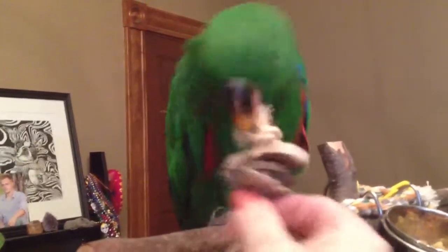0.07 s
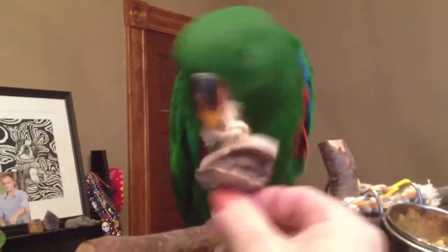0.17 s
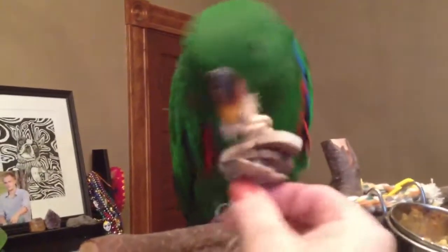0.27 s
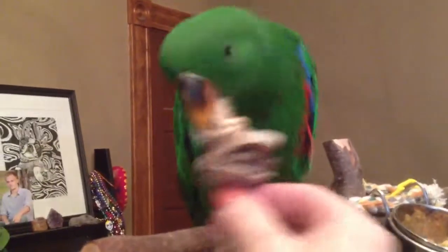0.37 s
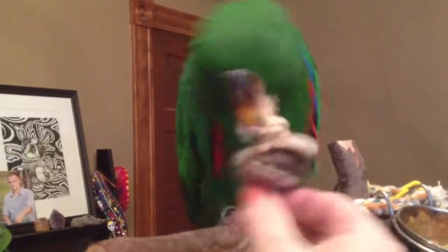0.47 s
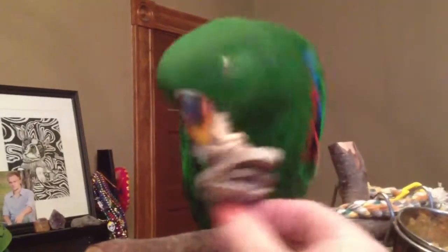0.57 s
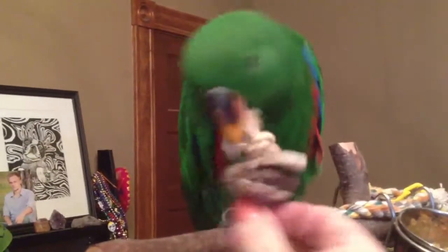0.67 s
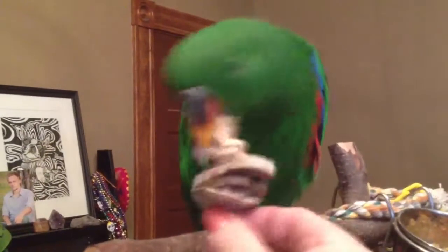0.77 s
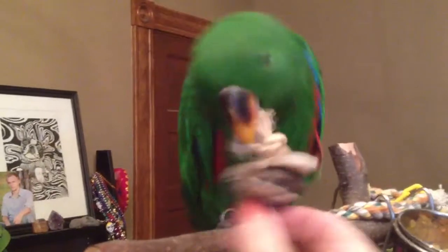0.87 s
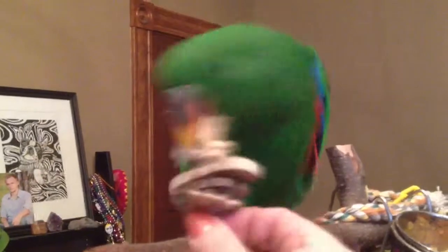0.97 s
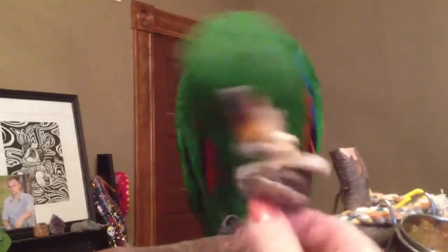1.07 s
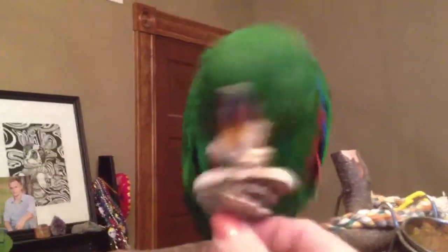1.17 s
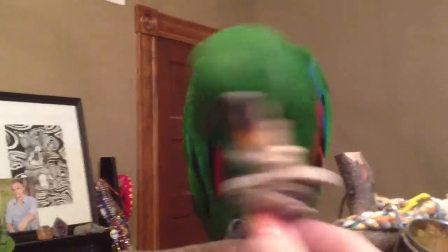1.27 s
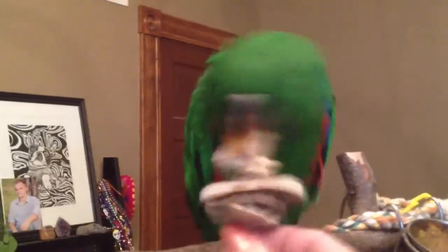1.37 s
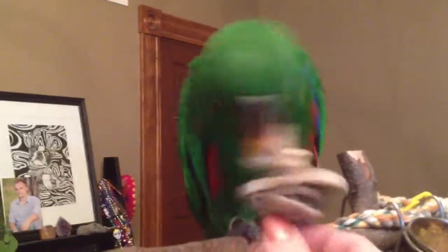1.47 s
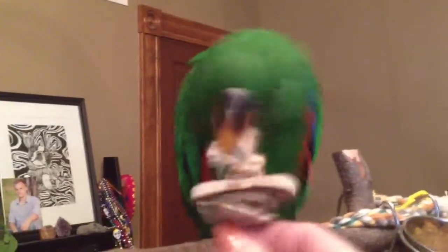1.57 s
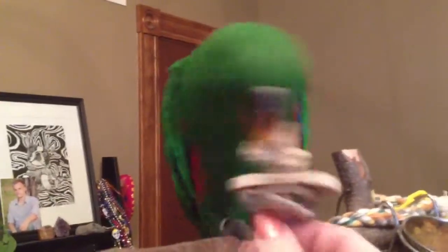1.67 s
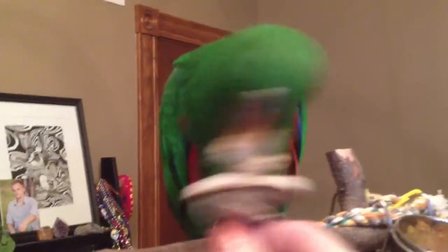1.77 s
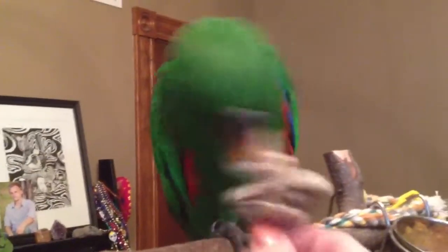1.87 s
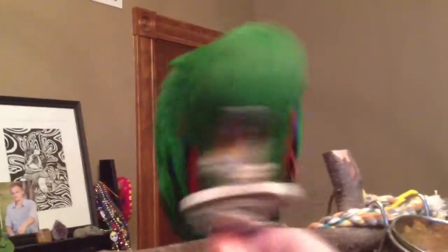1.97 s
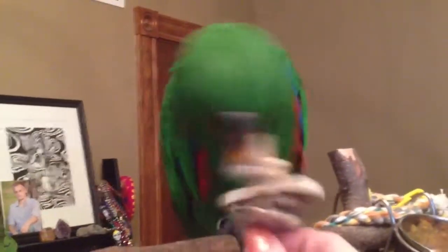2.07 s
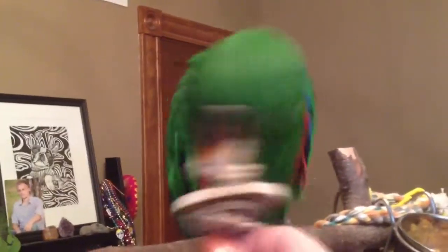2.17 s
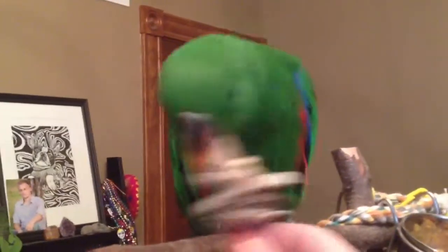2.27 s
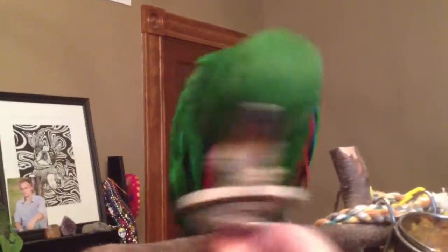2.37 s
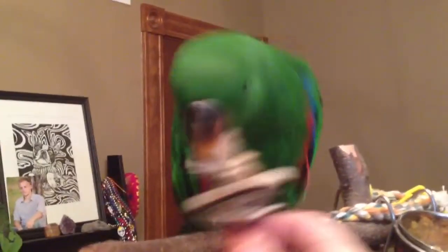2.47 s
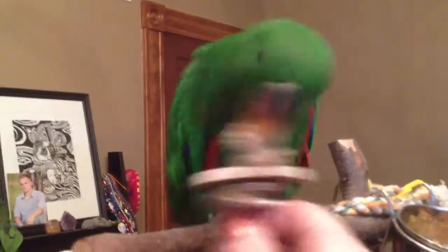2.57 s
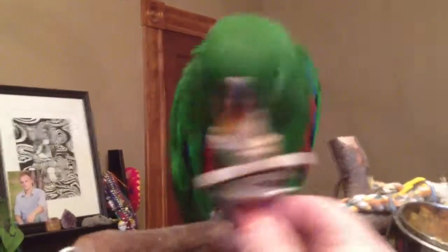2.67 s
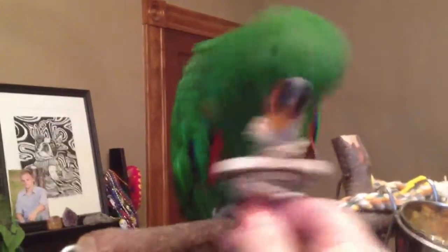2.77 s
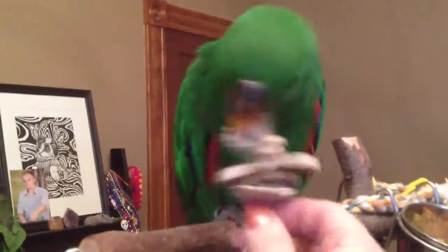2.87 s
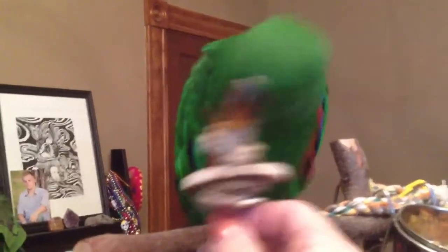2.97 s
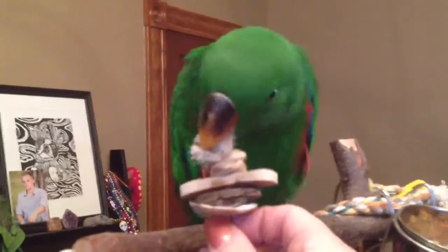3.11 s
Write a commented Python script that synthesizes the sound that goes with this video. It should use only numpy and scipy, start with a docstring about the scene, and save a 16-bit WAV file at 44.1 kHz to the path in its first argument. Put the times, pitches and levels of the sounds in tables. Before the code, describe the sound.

A wooden chew toy clatters in a parrot's beak, about five shakes a second: dry clacks, bead clicks and tiny ticks over soft rustling and low thuds, close microphone in a small quiet room.

```python
"""Parrot shaking a wooden chew toy

Close microphone in a small room: a parrot swings discs and beads on a rope, about five swings a second.
Pieces click and scrape and the stack knocks together, each made of short decaying modes and a buzz of
neighbours; most carry a room tail of sparse echoes. Rope and feathers rustle and a soft low thud follows
each swing, all shaped noise. Room noise and faint hum sines lie beneath."""
import sys
import numpy as np
from scipy import signal
from scipy.fft import rfft, irfft, next_fast_len
from scipy.io import wavfile
from scipy.ndimage import uniform_filter1d

SR = 44100
rng = np.random.default_rng(int(sys.argv[2]) if len(sys.argv) > 2 else 0)


def persist_wave(psi):
    """Save psi, clipped to +-1, as 16-bit WAV."""
    counts = np.round(np.clip(psi, -1, 1) * 32767).astype(np.int16)
    wavfile.write(sys.argv[1], SR, np.atleast_2d(counts).T)


N = 141120  # samples, 3.2 s

# Room noise spectrum. Each row: frequency in Hz, relative density in dB.
FLOOR_SPECTRUM = [(25, -49), (60, -32), (130, 2.5), (300, 4.5), (1000, -3), (15000, -6.5)]
# Steady hum. Each row: frequency in Hz, rms level in dB.
HUM_TONES = [(86, -87.5), (240, -81.5), (360, -83)]
# How strongly the rope is worked. Each row: time in seconds, rms level of the rubbing in dB.
ROPE_WORKING = [(0, -62.5), (.3, -66.5), (.39, -72.5), (.5, -62), (.95, -61.5), (1.4, -58.5), (2.03, -56),
                (2.21, -61.5), (2.35, -57), (3.0, -54.5), (3.2, -66)]
# Rope hiss spectrum. Each row: frequency in Hz, relative density in dB.
ROPE_SPECTRUM = [(200, -21), (800, -7), (4500, -3), (7600, -2.5), (9200, -11), (12000, -5.5), (15000, -10)]
# Swings of the head. Each row: rustle peak in seconds, rustle level in dB, thud level in dB.
HEAD_SWINGS = [(0.031, -52, -57.5), (0.124, -90, -62), (0.258, -52, -66), (0.451, -51, -61),
               (0.653, -56, -59.5), (0.856, -55.5, -61), (1.09, -49, -56), (1.288, -48.5, -62.5),
               (1.481, -47.5, -58.5), (1.678, -50, -58), (1.88, -51, -61.5), (2.09, -49, -55),
               (2.307, -47.5, -54.5), (2.519, -46.5, -54), (2.712, -48.5, -55.5), (2.907, -50, -57),
               (3.14, -60, -69)]
# Feather and fibre spectrum. Each row: frequency in Hz, relative density in dB.
RUSTLE_SPECTRUM = [(150, -25), (600, -18), (1400, 2), (2300, 2.5), (4300, 2.5), (5200, -9), (7600, -5),
                   (9300, -12), (12000, -8.5), (15500, -20)]
# Spectrum of the soft low thud. Each row: frequency in Hz, relative density in dB.
THUD_SPECTRUM = [(100, -78), (350, -4), (530, -3.5), (700, 11.5), (830, 2), (950, 0), (1250, -3.5),
                 (2200, -46)]
# The stack knocks together. Each row: start in seconds, level in dB, brightness in dB per octave.
STACK_KNOCKS = [(.033, -35.5, -4.5), (0.1533, -37.5, 0.5), (0.2485, -22, -3), (0.2978, -40.5, -8),
                (0.4645, -13, -1.5), (0.474, -37, -15), (0.5248, -24, -3.5), (0.6674, -29, -6.5),
                (0.7609, -33.5, 1), (1.071, -34, -10), (1.0893, -29, -6), (1.0966, -26, -2),
                (1.1029, -19.5, -5.5), (1.2368, -25.5, 0.5), (1.2437, -33.5, -5), (1.274, -27, -5),
                (1.2846, -22, -5), (1.4427, -34, -3), (1.4764, -29.5, -6), (1.493, -35.5, -16),
                (1.5622, -25.5, 0.5), (1.6922, -15.5, -3), (1.7635, -35, -0.5), (1.8706, -28, -1),
                (1.9022, -32.5, -13.5), (2.0712, -35, 4), (2.095, -31.5, 5), (2.2978, -23.5, -3.5),
                (2.3121, -26.5, 0), (2.496, -25.5, 4.5), (2.5191, -24, 5.5), (2.92, -18, -1.5),
                (2.9685, -32, -8.5)]
# The stack scrapes lightly. Each row: start in seconds, level in dB.
STACK_SCRAPES = [(0.0394, -43), (0.2412, -39), (0.44, -28.5), (0.6481, -34.5), (0.8475, -37.5),
                 (1.222, -40.5), (1.275, -33), (1.438, -36), (1.482, -38), (2.4993, -37), (2.519, -31),
                 (2.7039, -33), (2.7208, -36), (2.898, -29.5)]
# A bead clicks and skids. Each row: start in seconds, level in dB.
BEAD_CLICKS = [(0.174, -56), (0.4265, -33.5), (1.0513, -18), (1.294, -25), (1.3476, -39), (1.4057, -34),
               (1.4708, -33.5), (1.5274, -39), (1.5926, -25.5), (1.619, -37.5), (1.6975, -34.5),
               (1.9681, -30), (2.604, -32), (2.672, -35)]
# A disc clacks. Each row: start in seconds, level in dB.
DISC_CLACKS = [(.2332, -38), (.6188, -34.5), (.6245, -31.5), (.629, -35), (.6424, -30.5), (.8205, -33),
               (.8245, -33.5), (1.0267, -29.5), (1.0467, -22), (1.0511, -25), (1.0545, -20), (1.1861, -40),
               (1.4666, -29.5), (1.655, -28), (1.6655, -27), (1.8243, -34), (1.9555, -44), (2.059, -26),
               (2.2594, -22.5), (2.467, -25.5)]
# A small hard piece ticks. Each row: start in seconds, level in dB.
HARD_TICKS = [(1.235, -38), (1.432, -38), (1.558, -36.5), (1.6391, -34), (1.8462, -29), (2.0486, -24),
              (2.2554, -26), (2.4817, -21), (2.6805, -25)]
# Ringing of the stack. Each row: frequency in Hz, relative level in dB, 60 dB decay time in seconds.
STACK_MODES = [(1820, -11.5, 0.003), (2234, -13, 0.0063), (3615, 0.5, 0.0024), (4627, 3.5, 0.0027),
               (6100, 0.5, 0.0016), (7850, -5, 0.0026), (12030, 3, 0.00055)]
# Ringing of a disc. Each row: frequency in Hz, relative level in dB, 60 dB decay time in seconds.
DISC_MODES = [(2920, 1, 0.0011), (4044, -3.5, 0.012), (4290, -2, 0.0037), (6610, 4.5, 0.0013),
              (7684, -1, 0.012), (10900, -8, 0.0047), (11500, 10, 0.00088)]
# Ringing of a bead. Each row: frequency in Hz, relative level in dB, 60 dB decay time in seconds.
BEAD_MODES = [(1520, -9, 0.0044), (2930, -5, 0.0072), (4200, -2.5, 0.0099), (5610, 6.5, 0.0088),
              (5710, 7, 0.011), (7430, 0.5, 0.0051), (12800, 2, 0.0009)]
# Ringing of the small hard piece. Each row: frequency in Hz, relative level in dB, 60 dB decay in seconds.
TICK_MODES = [(4930, 1, 0.0092), (6930, 12.5, 0.0017), (8940, 13, 0.0019), (10090, 3.5, 0.023),
              (11400, -10.5, 0.051)]
# Decay of the room. Each row: frequency in Hz, 60 dB decay time in seconds.
ROOM_DECAY = [(2000, 0.51), (5000, 0.26), (14000, 0.08)]

FLOOR_DB = -64.5  # rms
RUSTLE_RISE_S, RUSTLE_FALL_S = 0.016, 0.027  # time constants
THUD_LAG_S, THUD_RISE_S, THUD_FALL_S = 0.014, 0.01, 0.037
FIBRE_SNAPS_PER_S, FIBRE_DB = 380, -4  # level relative to the rustle noise
JOSTLES_PER_S, JOSTLE_DB, JOSTLE_SPREAD_DB = 45, 6.5, 8  # level over the rope rubbing
SCRAPE_S, SCRAPE_BRIGHT = 0.006, -5.5  # run length; dB per octave
BEAD_SKID_S = 0.0032
RATTLE_DB, RATTLE_T60_S, RATTLE_LAG_S = -9, 0.015, 0.001  # neighbouring pieces buzz after a contact
KNOCK_RATTLE_DB = -8  # buzz after an average knock
KNOCK_TIGHTENS = 0.17  # dB less buzz per dB of force, as the stack closes
BRIGHTENS = 0.48  # dB per octave for each dB of force: harder contacts are shorter
AVERAGE_KNOCK_DB = np.mean([db for _, db, _ in STACK_KNOCKS])
ROOM_DB, KNOCK_ROOM_DB = -12.5, -14.5  # tail relative to its contact
ROOM_GAP_S, ROOM_DENSE_S = 0.005, 0.99  # first echo; time by which the echoes would merge fully
RADIATES_ABOVE_HZ = 1400  # small pieces throw little bass into the room
ROOM_BLUR_HZ = 2600  # sound thrown in all directions comes back with its resonances blurred
PORT_HZ, PORT_WIDTH_HZ, PORT_SHARE = 4720, 150, 0.038  # resonance of the microphone port
TOP_HZ = 15300  # band limit of the recorder


def amp(db):
    """Decibels to gain."""
    return 10 ** (np.asarray(db) / 20)


def unit(x):
    """Scale to rms 1."""
    return x / np.sqrt(np.mean(x ** 2) + 1e-20)


def peak_unit(x):
    """Scale so the loudest half millisecond is as strong as a sine of peak 1."""
    return x / np.sqrt(2 * uniform_filter1d(x ** 2, size=22).max())


def decay(t, t60):
    """Exponential fall of 60 dB in t60 seconds."""
    return np.exp(-np.log(1000) * t / t60)


def along(points, hz):
    """Interpolate (Hz, value) points on a log frequency axis."""
    f, v = np.transpose(points)
    return np.interp(np.log(hz + 1), np.log(f + 1), v)


def filtered(x, response):
    """Filter x by a response given as a function of frequency."""
    m = next_fast_len(N + 8192)
    return irfft(rfft(x, m) * response(np.fft.rfftfreq(m, 1 / SR)), m)[:N]


def noise(spectrum, grain_db=0):
    """Coloured noise of rms 1, clumped into millisecond grains."""
    clumps = amp(grain_db * unit(uniform_filter1d(rng.standard_normal(N), size=60)))
    return unit(filtered(rng.standard_normal(N) * clumps, lambda hz: amp(along(spectrum, hz))))


def add(track, s, sound):
    """Mix a sound in at time s."""
    i = int(np.clip(round(s * SR), 0, N - 1))
    track[i:i + len(sound)] += sound[:N - i]


def swell(s, rise, fall):
    """A peak at s with exponential flanks."""
    t = np.arange(N) / SR - s
    return np.exp(np.minimum(t / rise, -t / fall))


def contact(modes, bright, rattle_db, scatter_db=1.5, detune=0.0088):
    """One contact: the piece rings briefly in slightly varied modes, then its neighbours buzz."""
    size = 2048
    t = np.arange(size) / SR
    hz, db, t60 = np.transpose(modes)[:, :, None]
    tilt_db = bright * np.log2(hz / hz.mean())
    signs = (-1) ** np.arange(len(hz))[:, None]
    gain = signs * amp(db + tilt_db + scatter_db * rng.standard_normal(hz.shape))
    phase = 2 * np.pi * hz * (1 + detune * rng.standard_normal(hz.shape)) * t
    ring = (gain * np.sin(phase) * decay(t, t60)).sum(0)
    ring = ring * (1 - np.exp(-t / 0.00007))  # soft attack, time constant in seconds
    ring = signal.lfilter(*signal.butter(1, 1100, 'high', fs=SR), ring)
    buzz = rng.standard_normal(size) * decay(t, RATTLE_T60_S) * (t > RATTLE_LAG_S)
    rattle = signal.fftconvolve(ring, buzz / np.linalg.norm(buzz))[:size]
    return peak_unit(ring + amp(rattle_db) * rattle)


def skid(modes, bright, length_s, count=5):
    """A sliding contact: a quick, uneven run of tiny impacts that tend to weaken as the piece settles."""
    out = 0
    for k, (late, force) in enumerate(rng.random((count, 2))):
        ring = contact(modes, bright, RATTLE_DB, scatter_db=4.0, detune=0.0072)
        delay = round(length_s * (k + late * (k > 0)) / count * SR)
        delayed = np.pad(ring, (delay, 0))[:len(ring)]
        out = out + (.5 + force) / np.sqrt(1 + k) * delayed
    return peak_unit(out)


def in_room(sound, room_db):
    """The sound with its own room tail, made of separate echoes that grow denser."""
    size = 11025
    density = np.arange(size) / SR / ROOM_DENSE_S
    echoes = rng.standard_normal(size) * (rng.random(size) < density)
    echoes /= np.sqrt(1 + np.arange(size))
    echoes[:round(ROOM_GAP_S * SR)] = 0
    hz, t, z = signal.stft(echoes, SR, nperseg=256)
    power = np.abs(rfft(sound)) ** 2
    apart = (hz[:, None] - np.fft.rfftfreq(len(sound), 1 / SR)) / ROOM_BLUR_HZ
    colour = np.sqrt(np.exp(-(2 * apart) ** 2) @ power)
    colour = colour * hz / np.hypot(hz, RADIATES_ABOVE_HZ)
    fading = decay(t, along(ROOM_DECAY, hz)[:, None])
    tail = signal.istft(z * colour[:, None] * fading, SR, nperseg=256)[1]
    out = amp(room_db) * np.linalg.norm(sound) * tail / np.linalg.norm(tail)
    out[:len(sound)] += sound
    return out


def force_bright(db):
    """Harder contacts are shorter, so their spectrum tilts up, in dB per octave."""
    return BRIGHTENS * (db - AVERAGE_KNOCK_DB)


def background():
    """Room noise with a faint hum of steady sines."""
    t = np.arange(N) / SR
    hum = sum(amp(db) * np.sqrt(2) * np.sin(2 * np.pi * hz * t) for hz, db in HUM_TONES)
    return amp(FLOOR_DB) * noise(FLOOR_SPECTRUM) + hum


def rope():
    """The rope rubs in beak and hand: grainy noise that follows how strongly it is worked."""
    level_db = np.interp(np.arange(N) / SR, *np.transpose(ROPE_WORKING))
    return amp(level_db) * noise(ROPE_SPECTRUM, grain_db=4.0)


def jostle():
    """Light random rubs of the stack, following the rope level; each has its own length and colour."""
    out = np.zeros(N)
    draws = rng.standard_normal((int(JOSTLES_PER_S * N / SR), 4))
    for k, (place, strength, colour, length) in enumerate(draws):
        s = (k + place) / JOSTLES_PER_S
        db = np.interp(s, *np.transpose(ROPE_WORKING)) + JOSTLE_DB
        db += JOSTLE_SPREAD_DB * np.clip(strength, -2, 2)
        add(out, abs(s), amp(db) * skid(STACK_MODES, 2 * colour, SCRAPE_S / 2 * abs(length)))
    return out


def rustles():
    """Each swing rustles the feathers (noise) and crackles the rope fibres (random snaps)."""
    level = sum(amp(db) * swell(s, RUSTLE_RISE_S, RUSTLE_FALL_S) for s, db, _ in HEAD_SWINGS)
    snaps = (rng.random(N) < FIBRE_SNAPS_PER_S / SR) * rng.standard_normal(N)
    crackle = unit(filtered(snaps, lambda hz: amp(along(RUSTLE_SPECTRUM, hz))))
    feathers = noise(RUSTLE_SPECTRUM, grain_db=-0.5)
    return level * unit(feathers + amp(FIBRE_DB) * crackle)


def thuds():
    """A soft low thud of shaped noise follows each swing, peaking just after its rustle."""
    level = sum(amp(db) * swell(s + THUD_LAG_S, THUD_RISE_S, THUD_FALL_S) for s, _, db in HEAD_SWINGS)
    return level * noise(THUD_SPECTRUM)


def knocks():
    """The stack knocks together; hard knocks close it and buzz less, light ones chatter."""
    out = np.zeros(N)
    for s, db, bright in STACK_KNOCKS:
        rattle_db = KNOCK_RATTLE_DB - KNOCK_TIGHTENS * (db - AVERAGE_KNOCK_DB)
        add(out, s, in_room(amp(db) * contact(STACK_MODES, bright, rattle_db), KNOCK_ROOM_DB))
    return out


def scrapes():
    """The stack scrapes lightly, in short uneven runs of impacts."""
    out = np.zeros(N)
    for s, db in STACK_SCRAPES:
        add(out, s, in_room(amp(db) * skid(STACK_MODES, SCRAPE_BRIGHT, SCRAPE_S), ROOM_DB))
    return out


def beads():
    """A bead clicks and skids, brighter when struck harder."""
    out = np.zeros(N)
    for s, db in BEAD_CLICKS:
        add(out, s, in_room(amp(db) * skid(BEAD_MODES, force_bright(db), BEAD_SKID_S), ROOM_DB))
    return out


def single_hits(hits, modes):
    """Single contacts of one piece, brighter when struck harder."""
    out = np.zeros(N)
    for s, db in hits:
        add(out, s, in_room(amp(db) * contact(modes, force_bright(db), RATTLE_DB), ROOM_DB))
    return out


def discs():
    """Discs clack, ringing in their own short modes."""
    return single_hits(DISC_CLACKS, DISC_MODES)


def ticks():
    """A small hard piece ticks in high modes."""
    return single_hits(HARD_TICKS, TICK_MODES)


def scene():
    """Everything at one close microphone."""
    handling = rope() + jostle() + rustles() + thuds()
    clatter = knocks() + scrapes() + beads() + discs() + ticks()
    return (background() + handling + clatter)[None]


def record(dry):
    """The microphone port resonates, with a dip just above; the recorder cuts steeply at its band limit."""
    def response(hz):
        """Direct sound plus the port resonance, under the band limit."""
        resonance = PORT_HZ ** 2 / (PORT_HZ ** 2 - hz ** 2 + 1j * hz * PORT_WIDTH_HZ)
        return (1 + PORT_SHARE * resonance) / np.sqrt(1 + (hz / TOP_HZ) ** 160)
    return filtered(dry[0], response)[None]


dry = scene()
out = record(dry)
persist_wave(out)
```